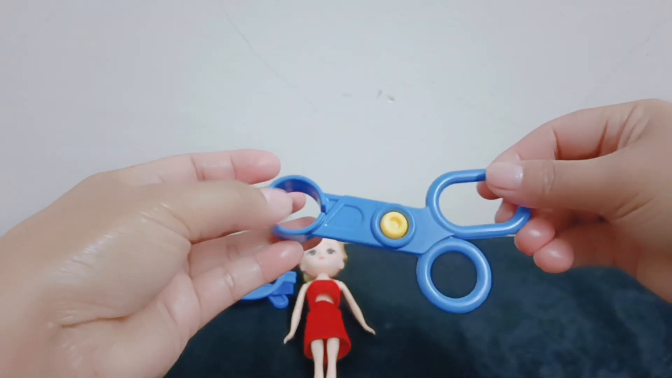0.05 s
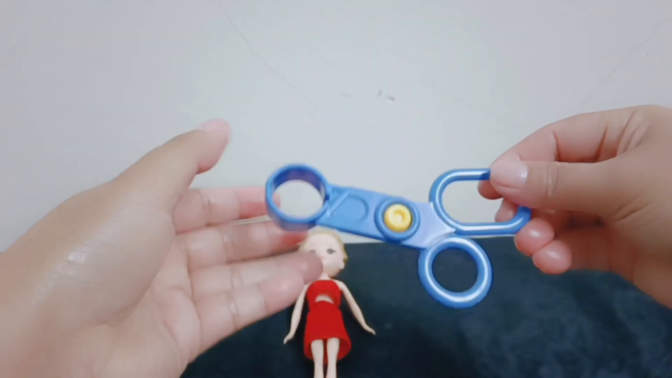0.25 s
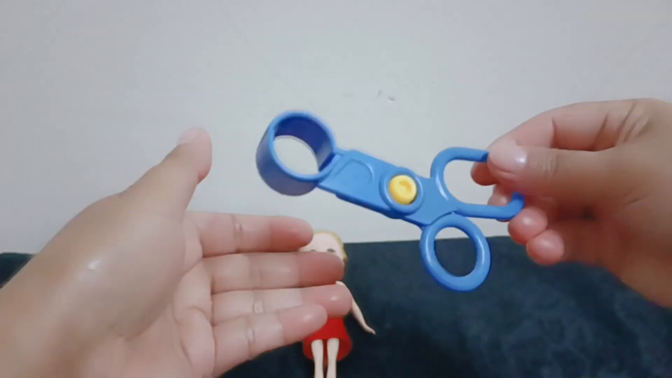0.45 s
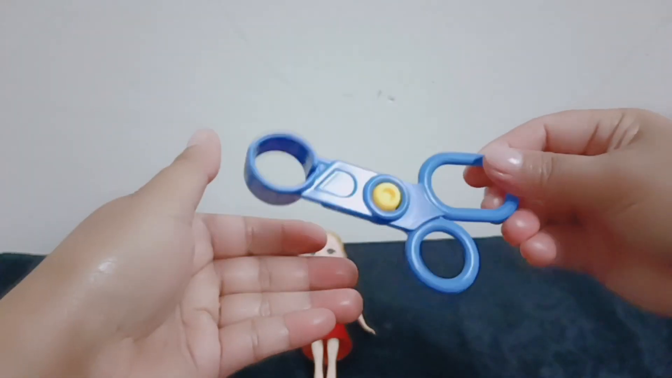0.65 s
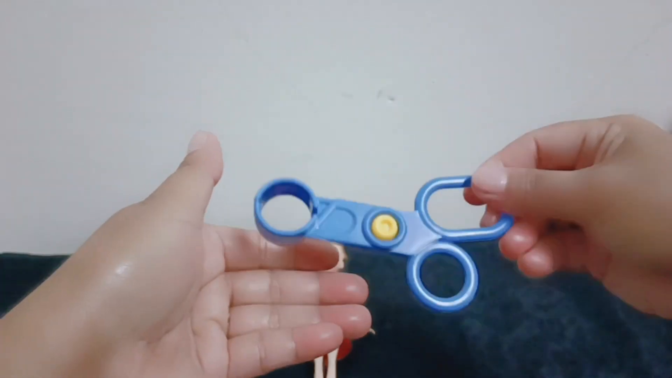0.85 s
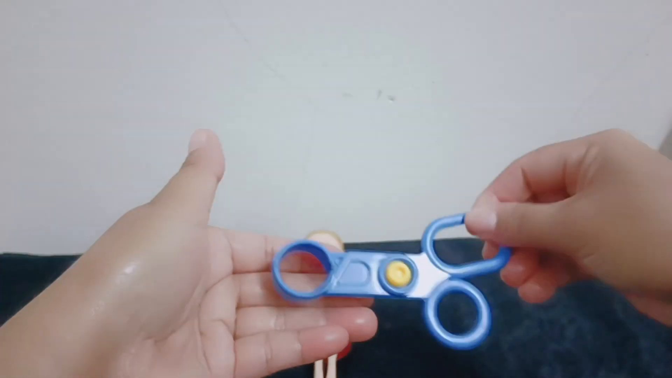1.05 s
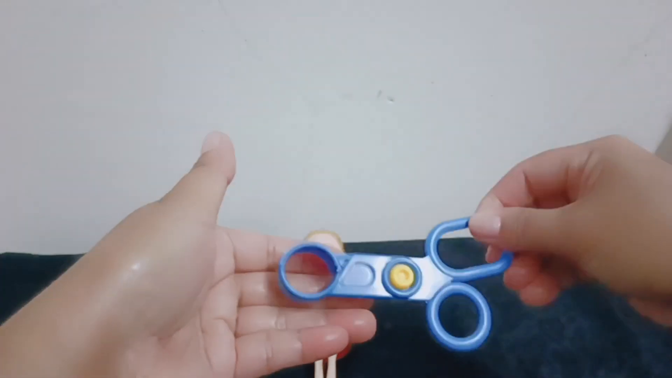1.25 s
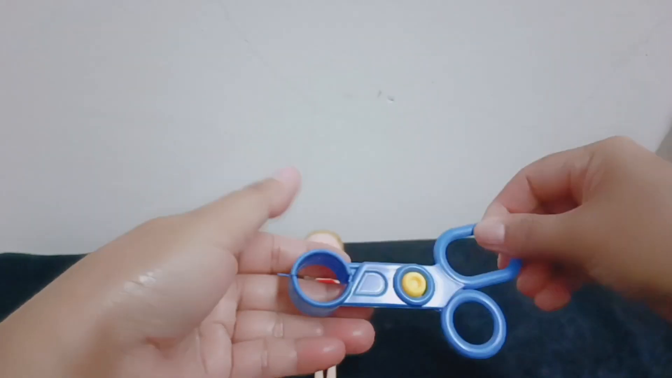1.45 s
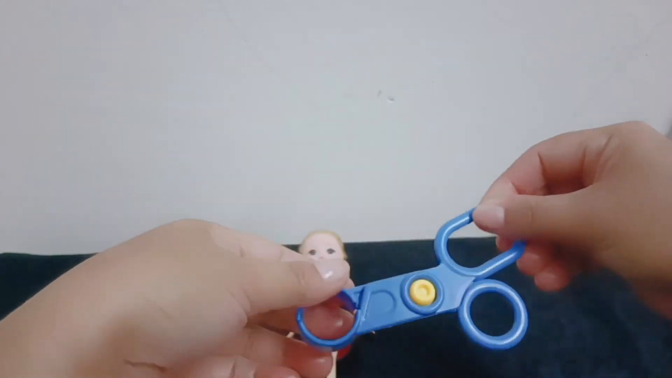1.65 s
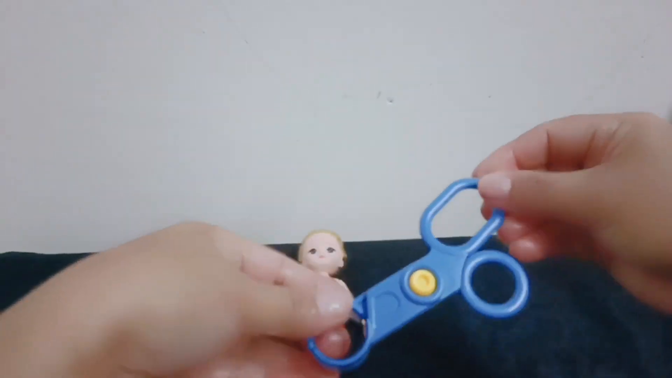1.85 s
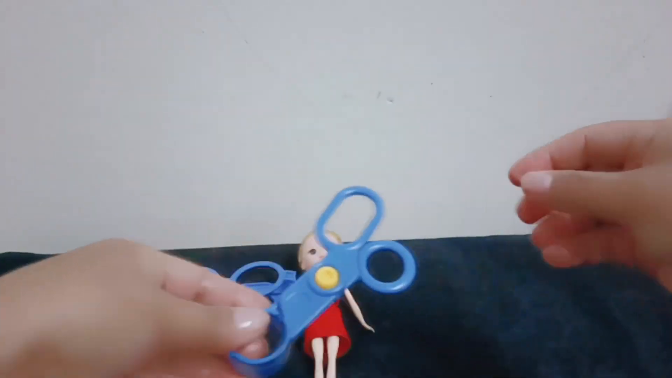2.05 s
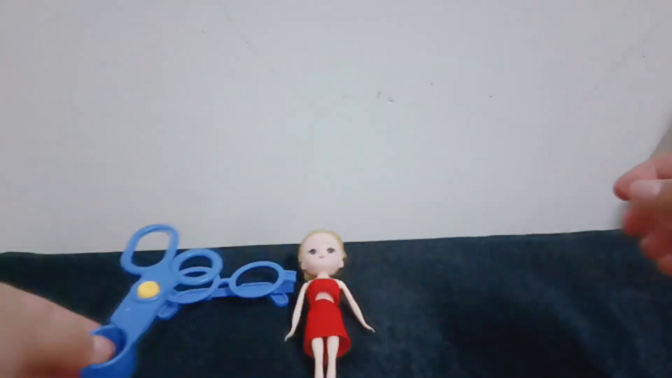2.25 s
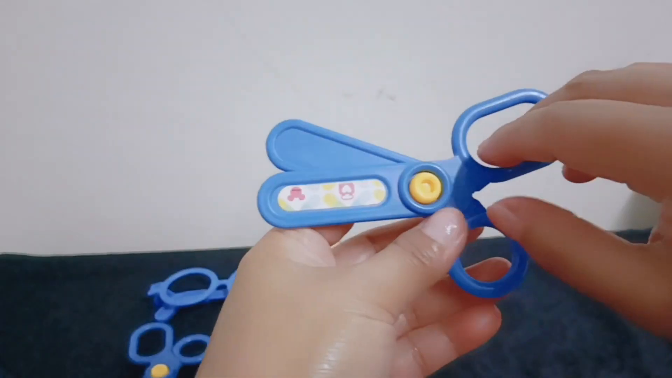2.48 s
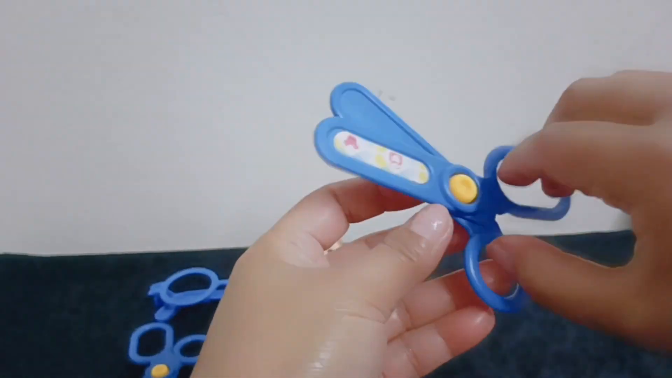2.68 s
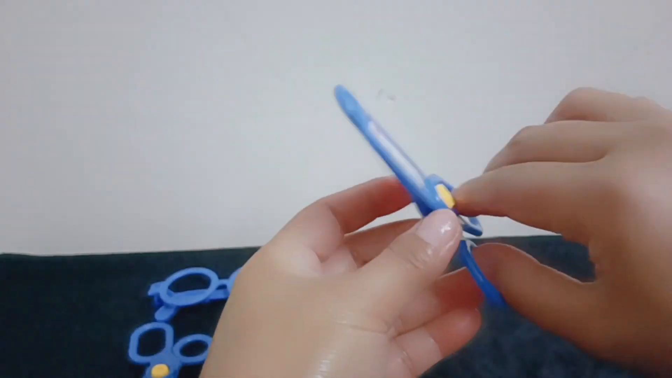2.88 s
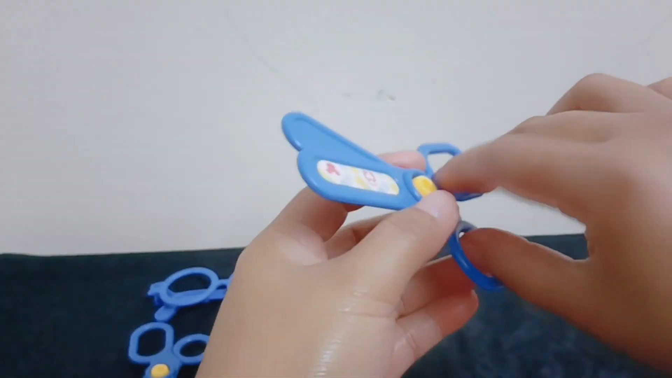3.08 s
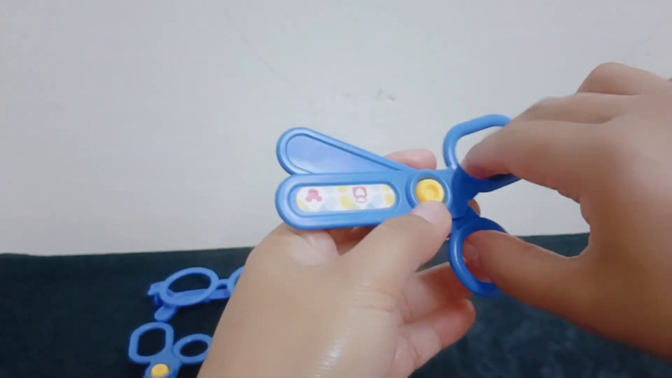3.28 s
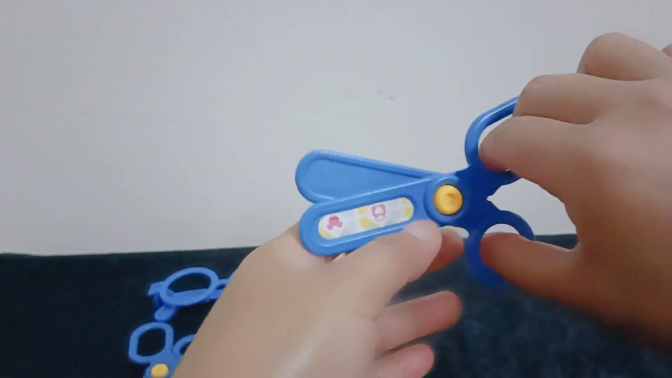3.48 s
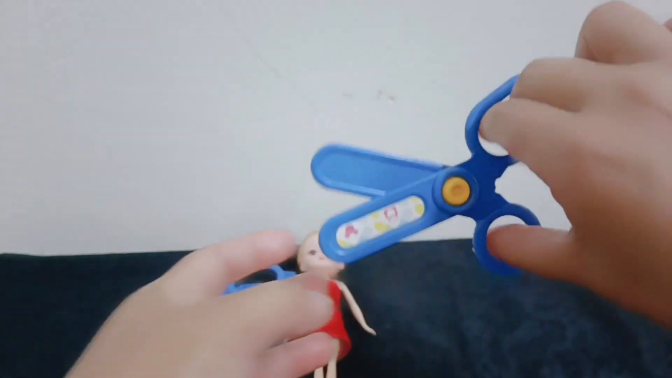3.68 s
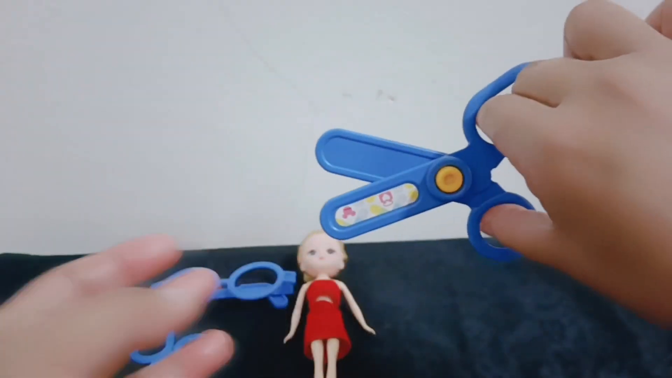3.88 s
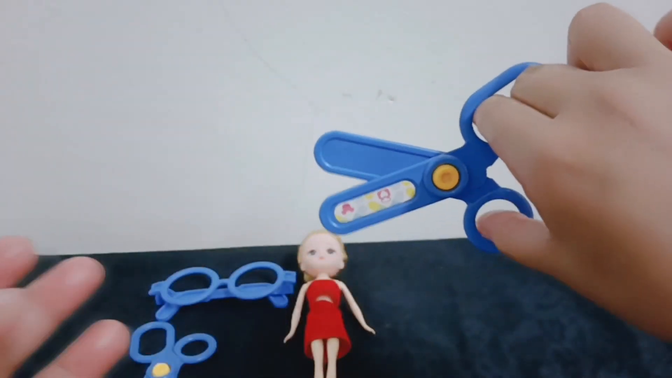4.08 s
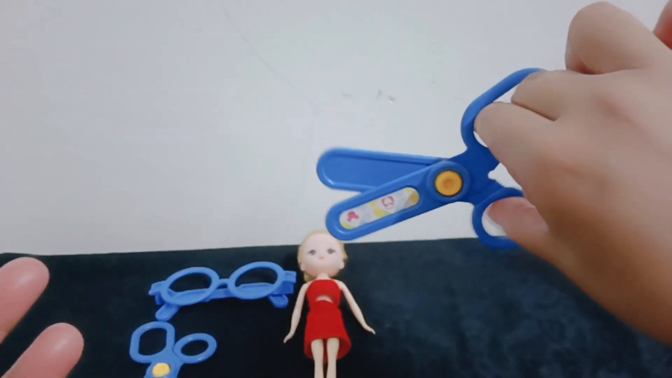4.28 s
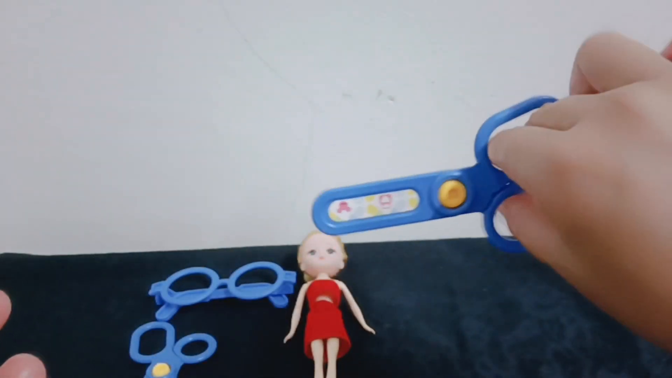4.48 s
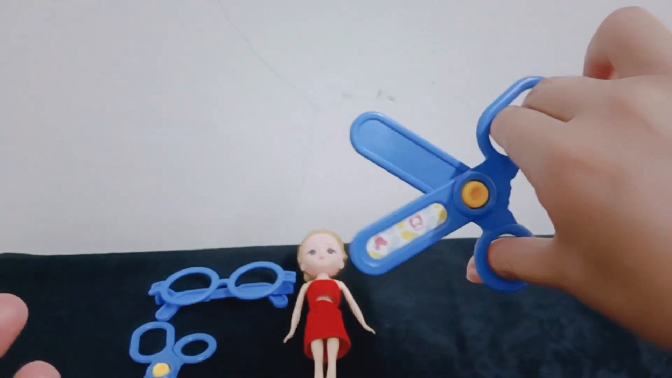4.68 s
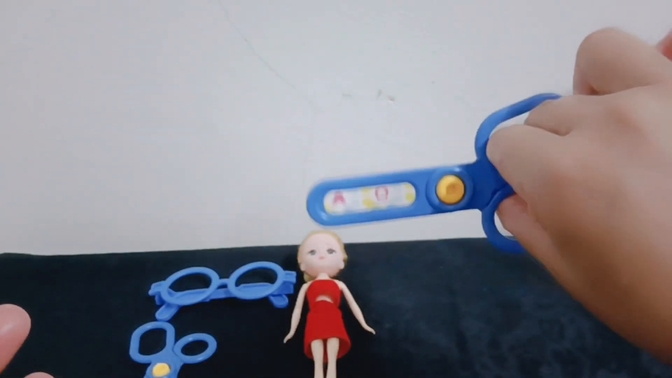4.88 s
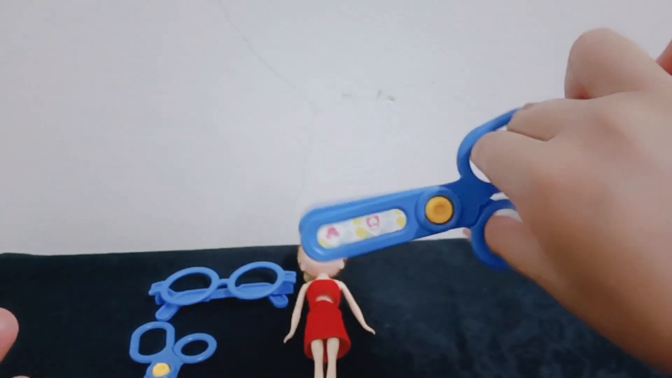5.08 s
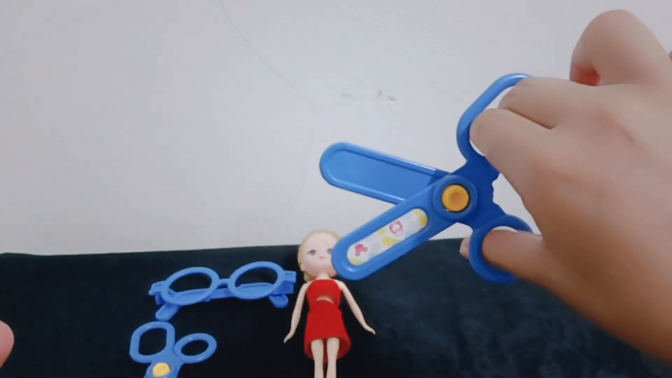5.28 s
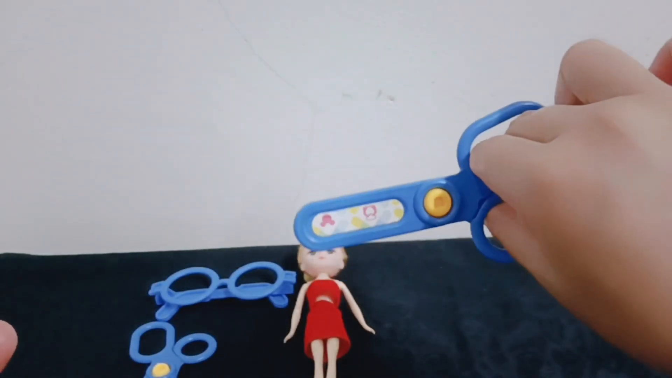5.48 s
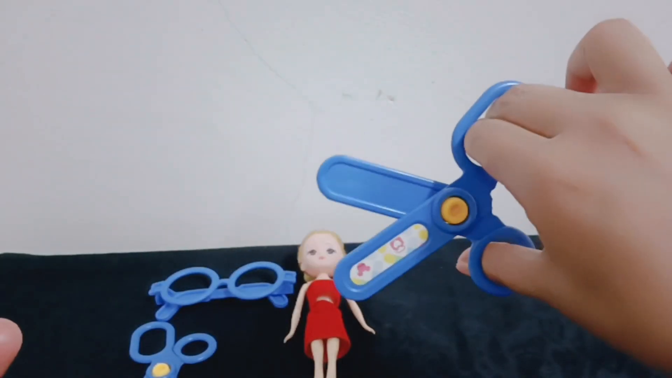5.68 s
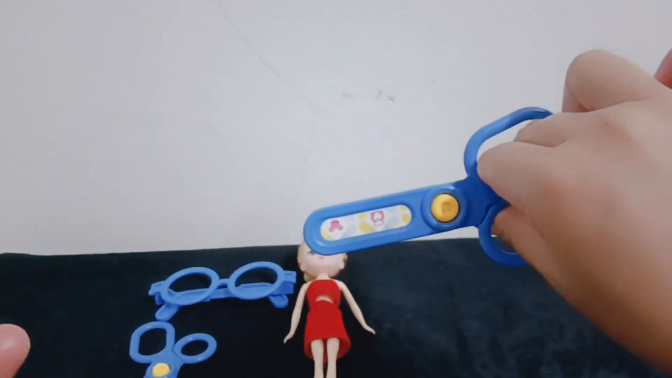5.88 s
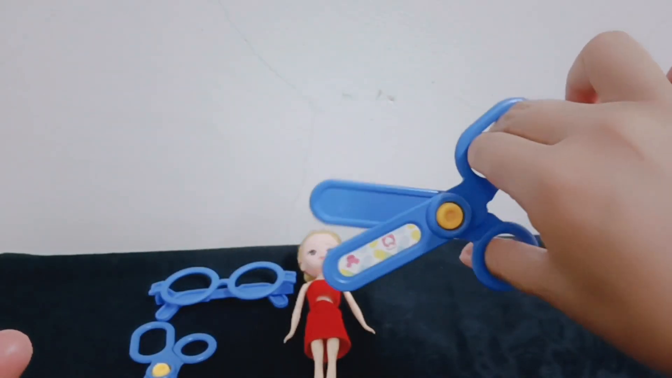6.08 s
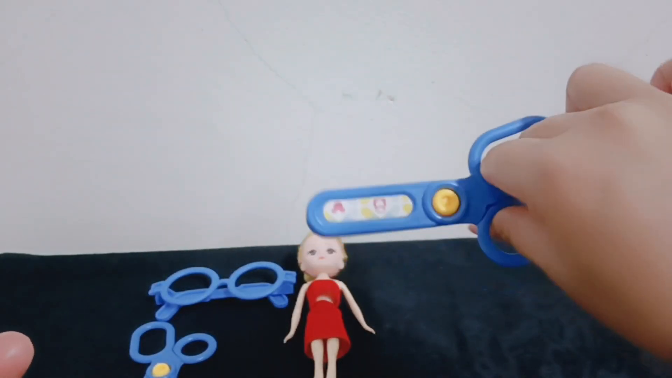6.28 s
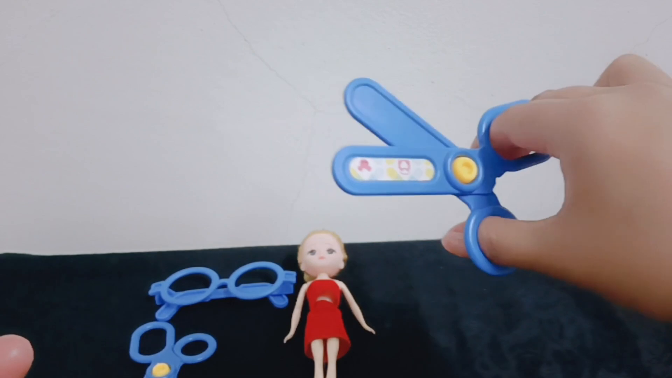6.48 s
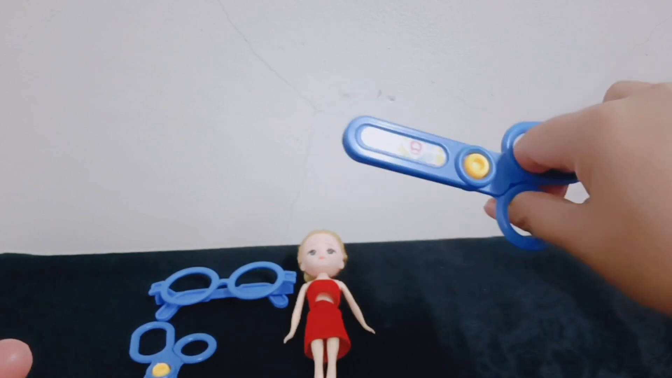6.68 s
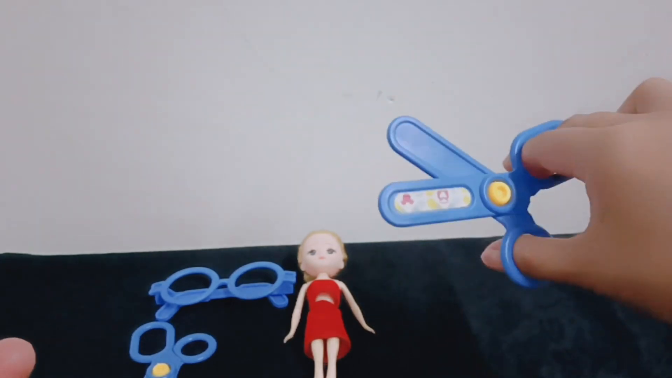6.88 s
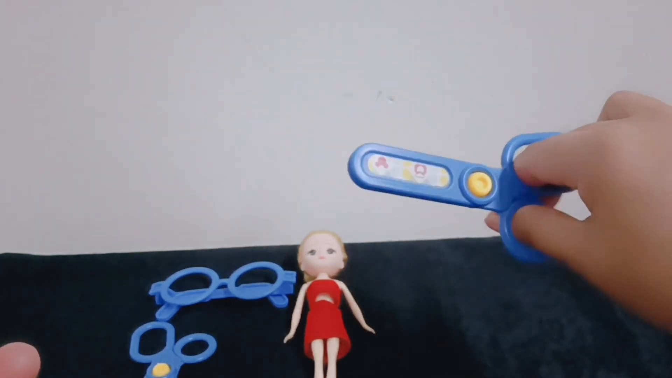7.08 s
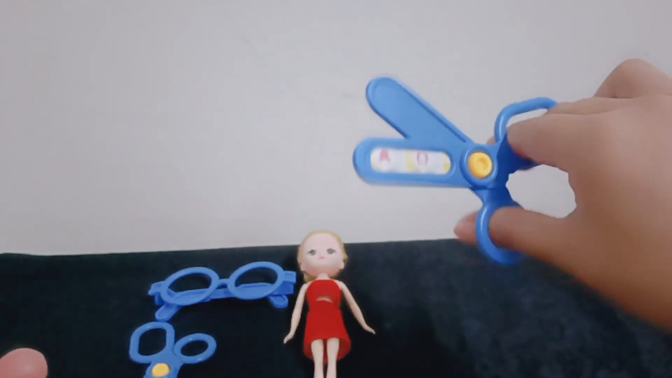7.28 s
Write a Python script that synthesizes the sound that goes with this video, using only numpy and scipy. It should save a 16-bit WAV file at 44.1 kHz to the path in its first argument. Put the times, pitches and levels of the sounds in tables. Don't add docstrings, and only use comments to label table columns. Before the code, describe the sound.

Close up in a small hard room, hollow plastic toy tongs tap a palm four times with faint low thuds. After a tiny dropout, plastic is quietly rubbed and ticked, then toy scissors snap shut crisply again and again, each preceded by a thin blade hiss. Far-off furniture drags and rumbles, and a chair squeaks faintly near the end. Close stereo microphones catch low background hum and hiss.

```python
import sys
import numpy as np
from scipy import signal
from scipy.io import wavfile
from scipy.ndimage import uniform_filter1d

SR = 44100
rng = np.random.default_rng(int(sys.argv[2]) if len(sys.argv) > 2 else 0)


def unload_wav(signal):
    wavfile.write(
        sys.argv[1],
        SR,
        np.round(np.clip(np.atleast_2d(signal).T, -1, 1) * 32767).astype(np.int16),
    )


def linear_from_db(decibels):
    return 10 ** (np.asarray(decibels, float) / 20)


N = 323694
TIME = np.arange(N) / SR
CONTROL_STEP = 32

# start in seconds, main ring in dB,
# low ring in dB, top ring in dB, share sent to the room in dB.
SNAPS = [(2.673, -49.5, -50, -58, 7), (2.8384, -47.5, -71, -59, 5), (4.087, -56.5, -52, -82, 6),
         (4.3974, -8.5, -15.5, -11, -2), (4.5545, -25, -40, -41, -4.5), (4.9259, -11.5, -19, -20, -3),
         (5.4135, -12.5, -19, -20, -2), (5.8469, -13.5, -19.5, -22, -3), (6.254, -29.5, -26.5, -55.5, -17),
         (6.2563, -13, -19, -20.5, -2.5), (6.6421, -12.5, -20, -19, -2), (7.013, -15, -21.5, -21.5, -2.5)]


def rms_one(x):
    return x / np.sqrt(np.mean(x ** 2) + 1e-20)


def at_hz(points, hz):
    table = np.array(points)
    return np.interp(np.log(hz), np.log(table[:, 0]), table[:, 1])


def resonate(hz, width_hz, x):
    b, a = signal.iirpeak(hz, hz / width_hz, fs=SR)
    return signal.lfilter(b, a, x)


def resonate_twice(hz, width_hz, x):
    return resonate(hz, width_hz, resonate(hz, width_hz, x))


def drift(rate):
    knots = rng.standard_normal(400)
    return np.interp(TIME * rate, np.arange(len(knots)), knots)


def swells(s, peak_db, length, rise, fall):
    s, peak_db, length, rise, fall = (np.reshape(v, (-1, 1)) for v in (s, peak_db, length, rise, fall))
    t = TIME[::CONTROL_STEP]
    before = np.maximum(s - t, 0) / np.maximum(rise, .002)
    after = np.maximum(t - s - length, 0) / np.maximum(fall, .002)
    return linear_from_db(np.maximum(peak_db - 30 * (before + after), -160))


def full(control):
    return np.interp(TIME, TIME[::CONTROL_STEP], control)


def stereo(pair, hz):
    # frequency in Hz, left-right likeness from 0 to 1.
    likeness = [(60, .9), (130, 0.85), (290, 0.9), (430, 0.69), (640, 0.21), (1400, 0), (16000, 0.0072)]
    alike = np.clip(at_hz(likeness, hz), 0, 1)
    mid, side = pair
    return np.sqrt(1 + alike) * mid + np.sqrt(1 - alike) * side * [[1], [-1]]


def banded(spectrum, patchy_db, rate=20, step=1 / 3):
    lowest, highest = spectrum[0][0], spectrum[-1][0]
    edges = lowest * 2 ** np.arange(0, np.log2(highest / lowest) + .01, step)
    white, out = rng.standard_normal((2, 2, N)), 0
    for k, (low, high) in enumerate(zip(edges, edges[1:])):
        hz = np.sqrt(low * high)
        band = signal.butter(2, [low, min(high, .45 * SR)], "band", fs=SR, output="sos")
        pair = signal.sosfilt(band, white[k % 2])
        out = out + linear_from_db(at_hz(spectrum, hz) + patchy_db * drift(rate)) * stereo(pair, hz)
    return rms_one(out)


def narrow(hz, width_hz):
    return rms_one(stereo(resonate_twice(hz, width_hz, rng.standard_normal((2, N))), hz))


def strikes(events, modes, hit_s, fall_s, grit_db, lag, alike, cut_hz, pan_db, bounce_s, bounce_db):
    direct, sent, t = np.zeros((2, N)), np.zeros((2, N)), np.arange(1024) / SR
    contact = np.minimum(t / hit_s, 1) * np.exp(-(t / fall_s) ** 2)
    hit = 1. * (np.arange(len(t)) == round(hit_s * SR))
    both = hit - linear_from_db(bounce_db) * np.roll(hit, round(bounce_s * SR))
    group = np.digitize(np.array(modes)[:, 0], [2600, 8000])
    small = signal.butter(8, cut_hz, "high", fs=SR, output="sos")
    dull_per_db = 0.7
    ring_on = .6
    for s, main_db, low_db, top_db, room_db in events:
        grit = linear_from_db(grit_db) * rng.standard_normal((3, len(t))) ** 3 * contact
        ears = both + alike * grit[2] + (1 - alike) * grit[:2]
        force = np.vstack([ears, hit])
        parts, i = np.zeros((3, 3, len(t))), round(s * SR)
        for k, (hz, width_hz, mode_db) in enumerate(modes):
            ring = resonate_twice(hz, max(width_hz, 480, hz / 9), force)
            ring[2] += ring_on * resonate(hz, max(width_hz, 60), ring[2])
            ring = ring / np.linalg.norm(ring, axis=1, keepdims=True)
            dull_db = (hz > 13500) * dull_per_db * (main_db + 14)
            parts[group[k]] += linear_from_db(mode_db + rng.normal(0, 1.5, (3, 1)) + dull_db) * ring
        parts = signal.sosfilt(small, parts)
        parts = parts / np.linalg.norm(parts, axis=2, keepdims=True)
        left, right, all_round = np.tensordot(linear_from_db([low_db, main_db, top_db]), parts, axes=1) * linear_from_db(14.5)
        heard = np.stack([np.roll(left, int(lag)), right])
        direct[:, i:i + len(t)] += heard * linear_from_db([[pan_db / 2], [-pan_db / 2]])
        sent[:, i:i + len(t)] += linear_from_db(room_db) * all_round * linear_from_db([[pan_db / 4], [-pan_db / 4]])
    return np.array([direct, sent])


def tongs():
    # start in seconds, main ring in dB, low ring in dB, top ring in dB, room share in dB.
    taps = [
        (0.8105, -32.5, -32.5, -33.5, -0.5),
        (0.8153, -22.5, -35.5, -42.5, -1),
        (1.0336, -11.5, -21, -17.5, -3),
        (1.255, -13, -26, -23.5, -2.5),
        (1.4453, -26, -28.5, -33, 2),
        (1.4472, -29, -36, -33, -4.5),
    ]
    # frequency in Hz, width in Hz, level in dB.
    shell = [(584, 150, -8), (1040, 340, -26.5), (1642, 180, 0.5), (1900, 87, 6.5), (3460, 2200, -23),
             (4350, 500, -9.5), (4580, 1760, 13.5), (5190, 1100, 0), (5720, 2100, 10.5), (7000, 600, -22.5),
             (8500, 500, -4), (10600, 700, -2.5), (10370, 600, 1), (11400, 600, 1), (12300, 450, -10.5),
             (14400, 2200, -10)]
    return strikes(taps, shell, hit_s=.001, fall_s=.0035, grit_db=-35, lag=11, alike=.5, cut_hz=380,
                   pan_db=-3.5, bounce_s=.0028, bounce_db=-12)


def thuds():
    # start in seconds, peak in dB, frequency in Hz.
    palm = [
        (0.8103, -31, 258.4),
        (1.031, -29, 257.5),
        (1.259, -33.5, 181.4),
        (1.446, -34.5, 278),
    ]
    out = np.zeros(N)
    for s, peak_db, hz in palm:
        since = np.maximum(TIME - s, 0)
        envelope = (1 - np.exp(-since / 0.0029)) * np.exp(-since / 0.0084)
        out += linear_from_db(peak_db + 3.5) * envelope * np.sin(2 * np.pi * hz * since)
    return out


def scissors():
    # frequency in Hz, width in Hz, level in dB.
    blades = [(1730, 110, -1.5), (1836, 250, 9.5), (2150, 150, 2), (3368, 250, -11.5), (3320, 560, -26.5),
              (4510, 910, -6), (4932, 180, -3.5), (5200, 500, -2), (5572, 170, 0.5), (6310, 400, 1.5),
              (7570, 210, -2), (5838, 500, 0.5), (9970, 700, 7.5), (10350, 230, 9.5), (12000, 270, 8),
              (13900, 1500, 5), (15800, 2500, 6)]
    return strikes(SNAPS, blades, hit_s=.001, fall_s=.003, grit_db=-26, lag=4, alike=.4, cut_hz=1350,
                   pan_db=-3.5, bounce_s=.0023, bounce_db=-7)


def knocks():
    # start in seconds, peak in dB, frequency in Hz, ring time in seconds.
    parts_hit = [(0.8117, -46, 1900, 0.0049), (0.8148, -27, 4670, .0006), (1.0354, -21.5, 1400, 0.00088),
                 (1.036, -39.5, 550, 0.0052), (1.2555, -36, 1866, 0.0026), (1.257, -47, 600, .003),
                 (1.275, -55, 520, .012), (1.2594, -33, 6000, .001), (1.445, -37, 1827, 0.0038),
                 (1.449, -35, 9850, 0.00091), (1.453, -49, 5180, .003), (2.8392, -55, 5500, .002),
                 (4.088, -54, 7900, .004), (4.3983, -15, 5500, .0008), (4.556, -42, 7500, .001),
                 (4.5555, -35, 2150, 0.0026), (2.6745, -55, 5720, .002), (5.8475, -29, 2050, .0008),
                 (6.2571, -29, 2050, .0008), (7.0134, -31, 2050, .0008), (5.4142, -29, 2050, .0008),
                 (6.6428, -28, 2150, 0.0009), (6.6433, -30, 4700, .0008), (6.643, -36, 15800, .0003)]
    out, t = np.zeros(N + 4096), TIME[:4096]
    loops = [(s, main_db - 37, 1280, .006) for s, main_db, *_ in SNAPS]
    tips = [(s + .0011, main_db - 14, 6300, .0003) for s, main_db, *_ in SNAPS]
    for s, peak_db, hz, ring_s in parts_hit + loops + tips:
        i = round(s * SR)
        envelope = t / ring_s * np.exp(1 - t / ring_s)
        out[i:i + len(t)] += linear_from_db(peak_db) * envelope * np.sin(2 * np.pi * hz * t)
    return np.stack([.75 * np.roll(out[:N], 9), 1.2 * out[:N]])


def slide():
    # start in seconds, hiss in dB, centre in Hz, length in seconds.
    closings = [(4.388, -56, 11550, .005), (4.903, -52, 10000, .008), (4.916, -50, 12000, .007),
                (5.389, -55.5, 9300, .008), (5.403, -47, 12500, 0.006), (5.816, -50, 9340, .012),
                (5.834, -52, 12800, .01), (6.229, -55, 9500, .012), (6.244, -55, 12500, .009),
                (6.614, -53.5, 9600, .014), (6.632, -50, 12800, .007), (6.987, -53, 9600, .012),
                (7.002, -54, 12500, .007), (7.33, -52.5, 9700, 0.022)]
    # start in seconds, hiss in dB, centre in Hz, length in seconds.
    openings = [(5.174, -60.5, 9100, 0.013), (5.632, -62, 8900, 0.015), (6.062, -67, 8160, .02),
                (6.45, -53, 8880, .005), (6.825, -54.5, 8720, 0.0054), (7.186, -52.5, 9600, 0.0045)]
    # peak time in seconds, hiss in dB, centre in Hz, rise in seconds,
    # fall in seconds.
    rubs = [(1.89, -65, 12200, 0.14, 0.096), (2.21, -77.5, 9140, 0.49, 0.23),
            (2.51, -71, 8500, 0.22, 0.094), (2.62, -72, 8700, 0.089, 0.2),
            (2.678, -59.5, 7400, 0.01, 0.081), (2.84, -70, 9500, 0.019, 0.04),
            (2.962, -70, 8020, 0.036, 0.09), (3.02, -54.5, 12000, 0.03, 0.044),
            (3.246, -63.5, 12000, 0.25, 0.024), (3.18, -70, 8500, .05, 0.091),
            (3.34, -69.5, 7920, .05, 0.12), (3.45, -77, 7800, .08, 0.14), (3.49, -78, 10400, .1, 0.13),
            (3.57, -73, 8780, 0.23, 0.32), (3.921, -78, 8780, 0.23, 0.18), (4.089, -70, 7730, 0.042, .035),
            (4.069, -78, 12300, .04, 0.028), (4.594, -48.5, 9500, 0.039, 0.029)]
    # frequency in Hz, density in dB per Hz.
    colour = [(2500, -26.5), (5000, -11.5), (6500, -4.5), (9000, -5.5), (12000, -3), (16000, -18.5)]
    # frequency in Hz, width in Hz, level in dB.
    handle_rings = [(6200, 130, -2), (7800, 190, -1), (8130, 200, -1.5), (8780, 160, -2), (9500, 150, -3),
                    (10430, 170, 0), (11500, 110, -2), (12520, 250, -1.5)]
    rings_db, fade_db = 7, 149.5

    shut, opened, rubbed = np.transpose(closings), np.transpose(openings), np.transpose(rubs)
    closing = swells(*shut[[0, 1, 3]], .04, .008)
    closing = closing * swells(shut[0] + shut[3], 0, N, 0.25, 1)
    opening = swells(*opened[[0, 1, 3]], 0.033, 0.058)
    rubbing = swells(*rubbed[:2], 0, *rubbed[3:])
    strokes = np.vstack([closing, opening, rubbing])
    hiss = strokes.sum(axis=0) + 1e-20
    centre_hz = full(np.hstack([shut[2], opened[2], rubbed[2]]) @ strokes / hiss)

    grit, out = rng.standard_normal((2, N)) * linear_from_db(5.3 * drift(45)), 0
    for k, hz in enumerate(np.geomspace(4000, 15500, 22)):
        lift_db = 10 * np.exp(-(np.log(hz / centre_hz) / .13) ** 2)
        gain = linear_from_db(at_hz(colour, hz) + lift_db + 4.5 * drift(12))
        out = out + gain * resonate(hz, hz / 40, grit) * (-1) ** k / np.sqrt(hz)
    for hz, width_hz, ring_db in handle_rings:
        near_db = -fade_db * np.minimum(np.log2(hz / centre_hz) ** 2, .1)
        ring = resonate(hz, np.clip(width_hz, 60, 300), grit)
        out = out + linear_from_db(rings_db + ring_db + near_db) * ring * (40 * width_hz) ** -.5
    power = uniform_filter1d(np.mean(out ** 2, axis=0), size=4096)
    return full(hiss) * out / np.sqrt(power) * linear_from_db([[-1.5], [1.5]])


def in_time(spans):
    s, *columns = np.transpose(np.vstack(spans))
    on = 0
    for rows in spans:
        first, last = rows[0][0], rows[-1][0]
        on = on + np.interp(TIME, [first - .01, first, last + .007, last + .011], [0, 1, 1, 0])
    return np.minimum(on, 1), [np.interp(TIME, s, c) for c in columns]


def drag():
    # time in seconds, effort in dB, sliding speed in dB.
    pushes = [
        [(3.105, -86, -11), (3.127, -38, -15), (3.175, -34, -6), (3.22, -38, -0.5), (3.43, -44, -3),
         (3.47, -59, 3), (3.53, -54, -9), (3.55, -67, 2)],
        [(3.56, -62, 7), (3.6, -68.5, 13.5), (3.66, -64.5, 9.5), (3.72, -69.5, 9.5), (3.76, -61, -4),
         (3.84, -62, 6.5), (3.9, -55.5, -5.5), (3.94, -73, 11)],
        [(4.14, -52, -15), (4.163, -28, -18), (4.21, -29, -5.5), (4.39, -34, 2), (4.58, -46.5, 3),
         (4.85, -44, -7), (5.03, -50.5, -7), (5.29, -54, -20), (5.33, -59, -6.5)],
    ]
    # start in seconds, boom in dB, length in seconds.
    jolts = [(3.151, -37.5, 0.017), (3.275, -52, 0.031), (3.51, -56.5, 0.011), (3.644, -61.5, 0.012),
             (3.89, -58, .02), (4.184, -31.5, .02), (4.271, -28.5, 0.029), (4.368, -41, 0.038),
             (4.47, -48, 0.083), (4.746, -42, 0.054), (4.84, -43, .01), (4.922, -58, .01),
             (5.188, -64, 0.012)]
    # frequency in Hz, width in Hz, level in dB.
    cabinet = [(274.4, 82, -8), (344.6, 40, -2), (430.2, 56, -4.5)]
    # frequency in Hz, density in dB per Hz.
    body_colour = [(430, 0.5), (520, 7), (620, 7.5), (800, 0.5), (930, -16), (1050, -22)]
    scrape_colour = [(1000, -18.5), (1400, 3.5), (1800, -6.5), (2200, -8), (2900, -37.5)]

    on, (effort_db, speed_db) = in_time(pushes)
    scrape_db = -53 + (effort_db + 40) + 1.1 * speed_db
    boom = full(swells(*np.transpose(jolts), 0.057, 0.1).max(axis=0)) * narrow(130.4, 37)
    hum = sum(linear_from_db(db + 3 * drift(15)) * narrow(hz, width_hz) for hz, width_hz, db in cabinet)
    hum = linear_from_db(effort_db) * hum * linear_from_db([[.7], [-.7]])
    body = banded(body_colour, patchy_db=3.0, rate=22, step=1 / 5)
    body = linear_from_db(effort_db + speed_db) * body * linear_from_db([[1], [-1]])
    scrape = banded(scrape_colour, patchy_db=2.5, rate=25, step=1 / 5)
    scrape = linear_from_db(scrape_db) * scrape * linear_from_db([[-1.5], [1.5]])
    return boom + on * (hum + body + scrape)


def squeak():
    # start in seconds, level in dB, length in seconds, rise in seconds, fall in seconds.
    singing = [
        (6.79, -49, .14, .08, 0.1),
        (6.75, -44.5, 0.081, 0.055, 0.15),
        (6.76, -47.5, 0.097, 0.029, 0.25),
    ]
    # frequency in Hz, width in Hz, level in dB.
    chair = [(495.7, 42, 0), (601.6, 32, -4), (973, 38, 1.5), (865, 96, -4.5), (1320, 61, -9.5),
             (1440, 72, -15), (1935, 64, -11)]
    levels = swells(*np.transpose(singing))
    out = 0
    for k, (hz, width_hz, db) in enumerate(chair):
        out = out + full(levels[min(k, 2)]) * linear_from_db(db) * narrow(hz, width_hz)
    return out


def chirps():
    # start in seconds, level in dB, frequency in Hz, length in seconds.
    puffs = [(1.17, -57, 2025, 0.077), (1.394, -64, 2130, 0.08), (1.633, -55.5, 2057, 0.045),
             (1.875, -64, 2100, 0.04), (2.594, -65, 2095, 0.13), (2.76, -67, 1964, 0.25)]
    out, white = 0, rng.standard_normal((2, N))
    for s, db, hz, length in puffs:
        envelope = np.interp(TIME, [s, s + 0.007, s + length, s + length + 0.031], [0.035, 1, 1.0, 0.047])
        puff = white * envelope + 1e-18
        main, below, lowest = (resonate(f, f / 28, puff) for f in (hz, .93 * hz, .8 * hz))
        out = out + linear_from_db(db + 20) * (main - .7 * below + .3 * lowest)
    return out


def background():
    # start in seconds, level in dB, length in seconds.
    deep_swells = [(0, -64, 0.017), (1.14, -55, 0.094), (1.5, -57.5, 0.022), (1.67, -54.5, 0.12),
                   (2.02, -51.5, 0.031), (2.2, -57.5, 0.018), (3.18, -54, 0.15), (4.18, -53.5, 0.34)]
    hum_swells = [(.45, -58.5, 0.12), (1.22, -56, 0.062), (1.51, -67, 0.012), (1.72, -67.5, 0.18),
                  (2.09, -60.5, 0.028), (2.91, -62.5, 0.029)]
    # frequency in Hz, density in dB per Hz.
    hiss_colour = [(100, -49.5), (170, -5), (352, -2.5), (516, -9), (557, -10), (675, -6), (817, -14),
                   (1200, -14.5), (3000, -14.5), (4580, -21), (5230, -23), (7240, -29.5), (8770, -29.5),
                   (15800, -27), (16500, -45)]
    # frequency in Hz, width in Hz, level in dB.
    fan = [(836.7, 27, -79), (1846, 52, -79), (2996, 27, -79.5), (3782, 110, -79), (5100, 180, -83),
           (5400, 130, -86.5), (12400, 1100, -91)]
    rise_s, fall_s = 0.075, 0.15
    deep_gain = linear_from_db(-74) + full(swells(*np.transpose(deep_swells), rise_s, fall_s).max(axis=0))
    hum_gain = linear_from_db(-67.5) + full(swells(*np.transpose(hum_swells), rise_s, fall_s).max(axis=0))
    deep = deep_gain * banded([(35, -8), (55, 0), (112, -2)], patchy_db=3.5, rate=12)
    hum = hum_gain * narrow(129, 35)
    whines = sum(linear_from_db(db - 1 + 5 * drift(11)) * narrow(hz, width_hz) for hz, width_hz, db in fan)
    hiss = linear_from_db(-64) * banded(hiss_colour, patchy_db=3.0)
    return hiss + whines + deep + hum


def room(x):
    # frequency in Hz, reverberation time in seconds.
    t60 = [(200, 0.16), (1500, 0.18), (2000, 0.2), (3000, 0.2), (3750, 0.33), (4300, 0.24), (5300, 0.31),
           (6500, 0.33), (8500, 0.34), (10500, 0.26), (15000, 0.23)]
    # frequency in Hz, level in dB.
    colour = [(200, -0.5), (1500, 1), (3000, 7.5), (4200, 3), (5500, 0), (7500, -3), (10000, 0), (12500, 1),
              (15000, -3), (16300, -12)]
    t, tail = np.arange(SR // 2) / SR, 0
    white, edges = rng.standard_normal((2, len(t))), 140 * 2 ** np.arange(0, 6.95, .2)
    for k, (low, high) in enumerate(zip(edges, edges[1:])):
        hz = np.sqrt(low * high)
        patch_db = np.interp(t * 60, np.arange(32), white[0, 32 * k:32 * k + 32])
        band = signal.sosfilt(signal.butter(2, [low, high], "band", fs=SR, output="sos"), white)
        decay_db = -60 * (t / at_hz(t60, hz)) ** 1.155
        tail = tail + band * linear_from_db(patch_db + at_hz(colour, hz) + decay_db)
    tail = tail + resonate_twice(5200, 500, white[::-1]) * linear_from_db(-4 - 60 * t / .55)
    tail = tail * (np.clip(t / .005, 0, 1) + 1.5 * np.exp(-t / .004))
    return signal.fftconvolve(x, tail, axes=1)[:, :N]


def scene():
    knock_shares = linear_from_db([[[0]], [[-7]]])
    direct, sent = tongs() + scissors() + thuds() + knocks() * knock_shares
    near = direct + linear_from_db(-32.0) * room(sent) + slide()
    return near + drag() + squeak() + chirps() + background()


def roll_off(x):
    return signal.sosfilt(signal.butter(12, 17150, fs=SR, output="sos"), x)


def record(dry):
    # frequency in Hz, width in Hz, depth from 0 to 1.
    notches = [(4250, 350, .55), (7100, 300, .15)]
    # time in seconds, gain in dB.
    low_fade = [(2.346, 0), (2.352, -80), (2.408, -80), (2.413, -22), (2.5, -12), (2.6, -1), (2.7, 0)]
    top_fade = [(2.346, 0), (2.352, -80), (2.408, -80), (2.415, -10), (2.55, 0)]
    heard = dry + 0.71 * resonate(5270, 5270 / 14, dry)
    for hz, width_hz, depth in notches:
        heard = heard - depth * resonate(hz, width_hz, heard)
    dulled = signal.sosfilt(signal.butter(12, 17000, fs=SR, output="sos"), heard)
    low = signal.sosfiltfilt(signal.butter(2, 5500, fs=SR, output="sos"), dulled)
    low_gain = linear_from_db(np.interp(TIME, *np.transpose(low_fade)))
    top_gain = linear_from_db(np.interp(TIME, *np.transpose(top_fade)))
    mix = low * low_gain + (dulled - low) * top_gain - .0003
    return roll_off(mix)


dry = scene()
out = record(dry)
unload_wav(out)
```